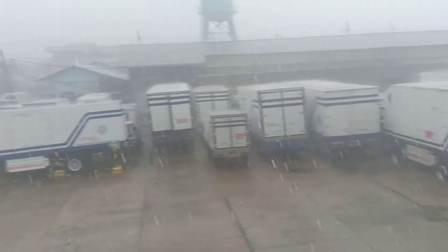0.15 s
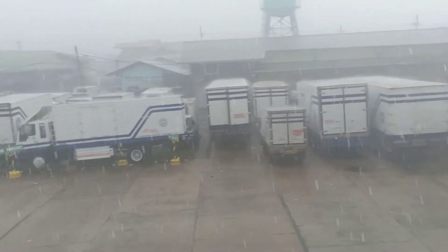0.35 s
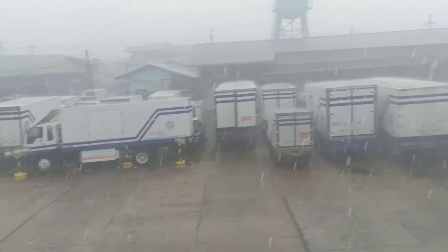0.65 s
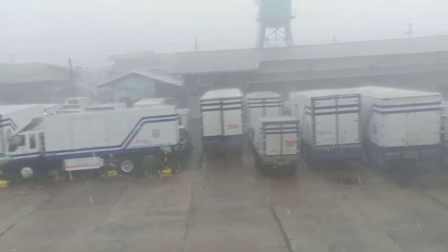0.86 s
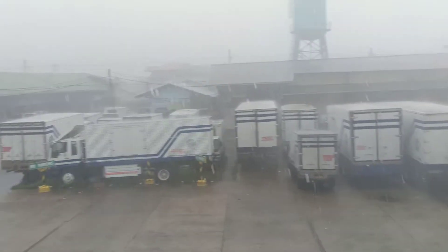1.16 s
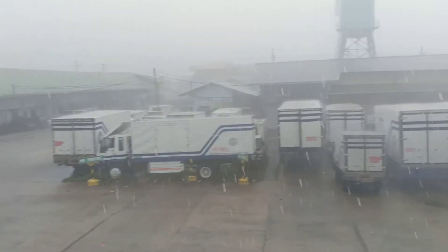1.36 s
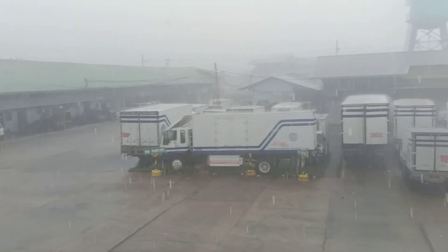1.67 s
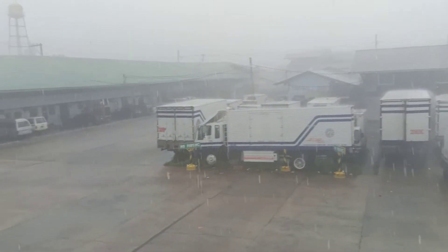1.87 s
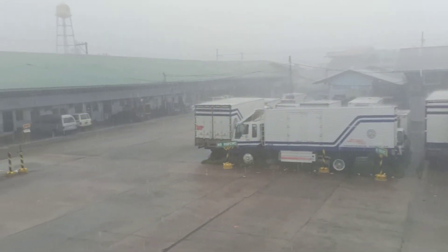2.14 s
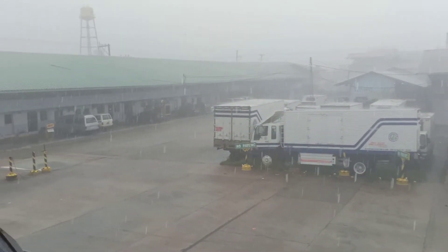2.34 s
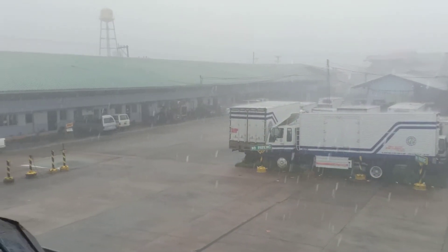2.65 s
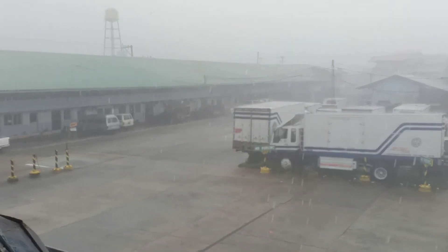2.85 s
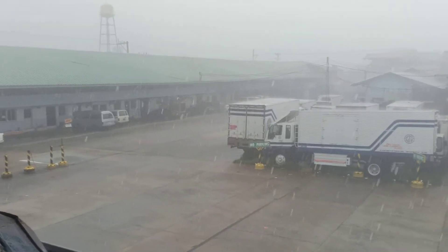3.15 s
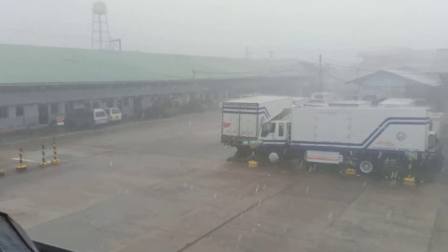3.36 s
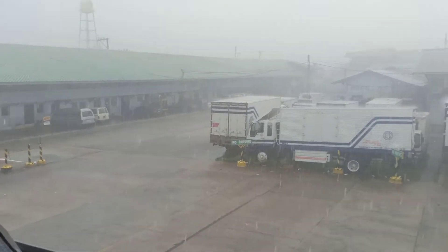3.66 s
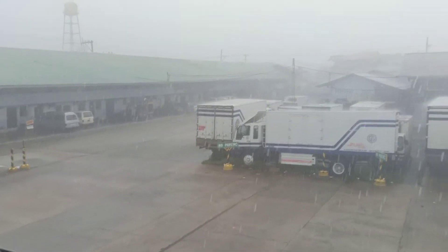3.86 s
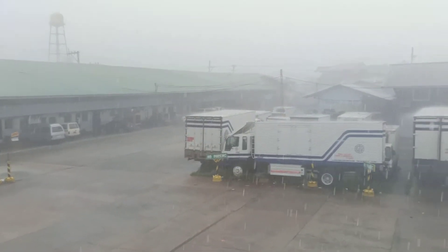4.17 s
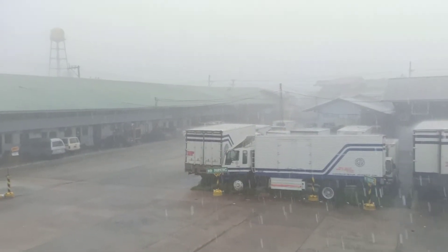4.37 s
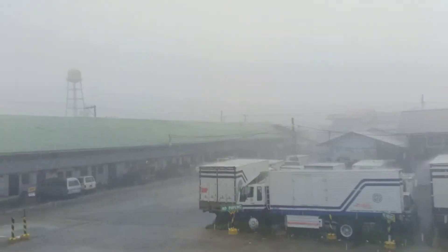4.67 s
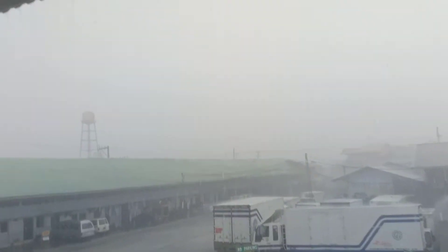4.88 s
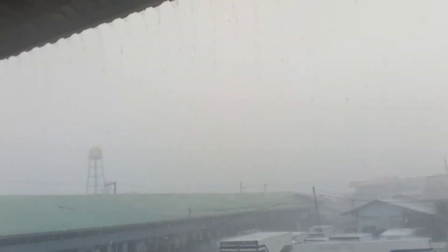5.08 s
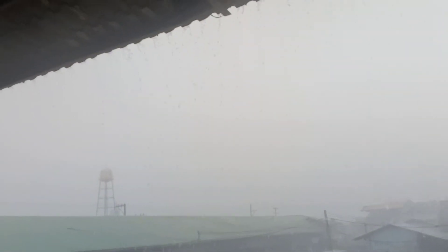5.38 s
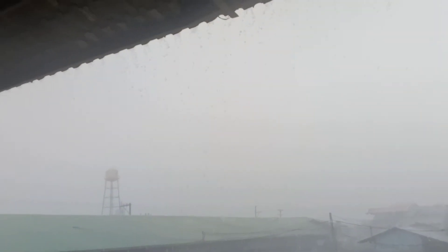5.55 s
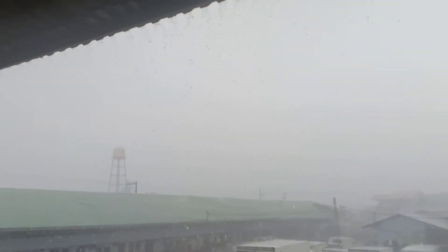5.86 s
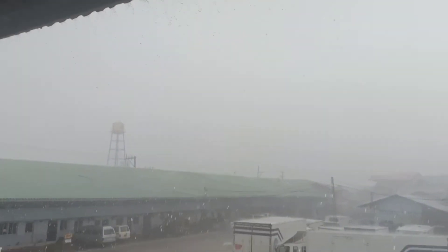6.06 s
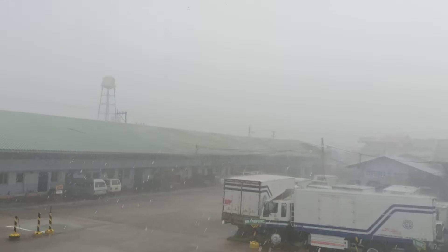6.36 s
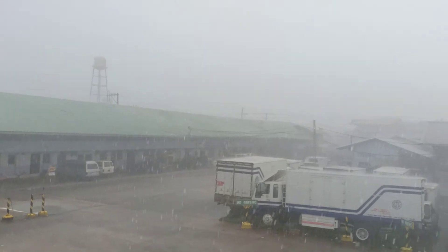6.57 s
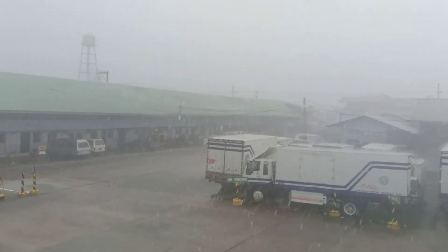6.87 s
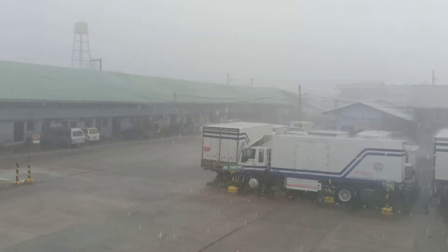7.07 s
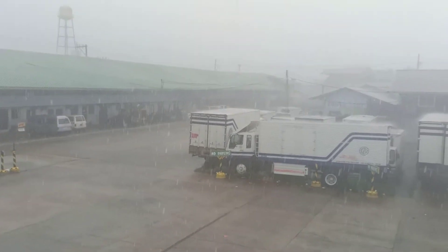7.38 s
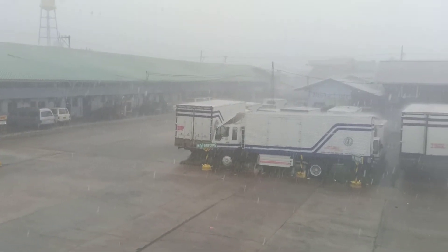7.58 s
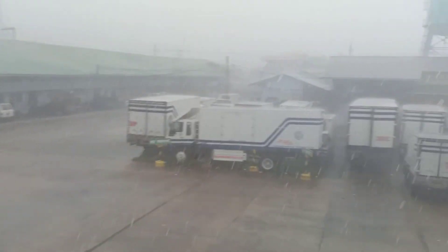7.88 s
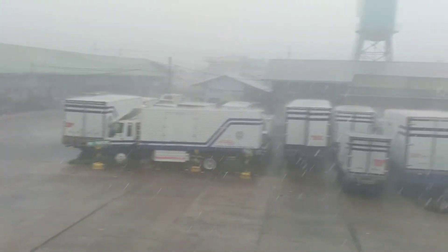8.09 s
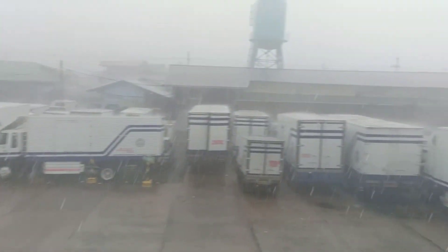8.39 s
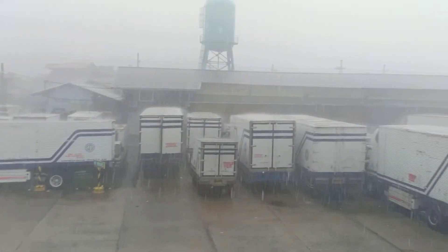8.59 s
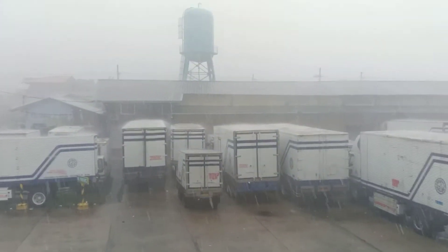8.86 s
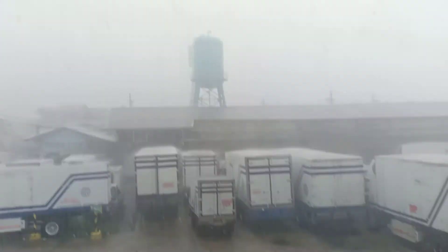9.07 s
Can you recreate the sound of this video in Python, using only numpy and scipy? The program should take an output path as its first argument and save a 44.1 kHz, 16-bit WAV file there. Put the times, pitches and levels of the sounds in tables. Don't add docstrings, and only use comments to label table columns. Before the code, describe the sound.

Heavy rain builds to a steady roar on metal roofs and wet concrete while wind gusts thump and flutter against the microphone.

```python
import sys
import numpy as np
from scipy import signal
from scipy.fft import rfft, irfft, next_fast_len
from scipy.io import wavfile
from scipy.ndimage import uniform_filter1d, map_coordinates

SR = 44100
rng = np.random.default_rng(int(sys.argv[2]) if len(sys.argv) > 2 else 0)


def store_wav(level_fs):
    pcm = np.round(np.clip(np.atleast_2d(level_fs), -1, 1) * 32767)
    wavfile.write(sys.argv[1], SR, pcm.T.astype(np.int16))


def natural_amplitude(level_db):
    exponent = np.asarray(level_db, float) / 20
    return 10 ** exponent


N = 407043
FRAME = 512

# time_s, yard_left_right_db, ridge_hz, ridge_lift_db, second_ridge_lift_db
CAMERA_TURNS = [(0, 1.5, 1490, 1.5, 3), (.8, 0.5, 1450, 0, 4.5), (1.5, 2, 1420, 3, 3),
                (2.4, 2.5, 1750, 3, 2), (3.4, 3.5, 1770, 3.5, 1.5), (4.4, 1.5, 1800, 3.5, 4),
                (4.9, 4, 2030, 5, 1), (5.1, -1, 2200, 8, .2), (5.7, -3.5, 2350, 7.5, 2),
                (6.15, -1.5, 2300, 7.5, .5), (6.4, 0.5, 2000, 8.5, 2), (7.3, 3.5, 1980, 2.5, .5),
                (8.2, 0.5, 1930, 6.5, 5.5), (8.7, 1.5, 2250, 2.5, 3.5), (9.23, 3, 2400, 1, .7)]


def rain():
    # time_s, downpour_db, spray_fineness_db, share_on_roofs_db
    downpour = [(0.0, -36, 0, 2), (1.16, -31.5, -0.5, -1), (1.54, -29, -1.5, 0), (2.0, -28.5, 0, 0),
                (3.01, -25, 0, 1), (3.37, -21.5, -1, -0.5), (4.42, -23.5, 1.5, 0), (5.73, -22.5, 1.5, 0.5),
                (6.35, -24.5, 3, 1), (7.17, -22, 1.5, 1), (7.4, -19.5, -0.5, -1), (7.56, -22, 0, 0.5),
                (8.1, -21, 0, -1), (8.23, -23.5, 0.5, 0.5), (8.71, -22.5, 0.5, -1), (8.92, -20.5, -1, -0.5),
                (9.23, -23.5, -1, 0)]
    # pitch_hz, level_db (per Hz)
    roar_tone = [(30, -120), (60, -20), (100, -11), (200, -8.5), (300, -5.5), (440, -2.5), (600, -0.5),
                 (800, -2), (1000, -3.5), (1300, -7), (1800, -11), (2600, -19), (4000, -120)]
    # pitch_hz, level_db (per Hz)
    spatter_tone = [(600, -120), (1000, -19), (1300, -11), (1700, -6), (2300, -3), (2900, -8),
                    (3300, -15.5), (4000, -36), (6000, -120)]
    # pitch_hz, level_db (per Hz)
    hiss_tone = [(1500, -120), (2500, -10.5), (3200, -6), (3600, -4), (4300, -2.5), (5040, 1), (5500, -3.5),
                 (6000, -5.5), (6600, -12), (7700, -18.5), (8200, -19.5), (8800, -22.5), (9200, -22),
                 (9600, -26.5), (10500, -65)]
    # pitch_hz, level_db (per Hz)
    fizz_tone = [(9000, -45), (9750, -12), (10250, -5), (10750, -9.5), (11350, -3), (12200, -7),
                 (12900, -6), (13500, 1), (14200, -2.5), (14700, -3.5), (15200, -5), (15500, -3.5)]

    pour_db, fine_db, roofs_db = curves(downpour)
    turn_db = curves(CAMERA_TURNS)[0]
    sides = np.array([[.5], [-.5]])

    def swell(grows, full_db=-23):
        return full_db + grows * (pour_db - full_db)

    sheets = wobble(2.6)
    roar = all_around(drops(spread_db=8.5, patchy_db=-0.27), roar_tone)
    spatter = all_around(drops(spread_db=12.5, patchy_db=0.2), spatter_tone)
    hiss = all_around(drops(spread_db=11, patchy_db=.5), hiss_tone)
    fizz = all_around(drops(spread_db=0, patchy_db=-1.0), fizz_tone)

    roar_db = swell(grows=1.06) - 0.22 + roofs_db - 0.83 * sides
    spatter_db = pour_db - 0.38 - .6 * fine_db + (turn_db - 0.7) * sides
    hiss_db = swell(grows=1) - 2.5 + .6 * fine_db + (3 + 0.13 * turn_db) * sides
    fizz_db = swell(grows=0.93) - 14.5 + fine_db + .7 * sides
    falling = natural_amplitude(roar_db) * roar + natural_amplitude(spatter_db) * spatter + natural_amplitude(hiss_db) * hiss + natural_amplitude(fizz_db) * fizz
    return housing(natural_amplitude(0.41 * sheets) * falling, width_hz=300)


def drops(spread_db, patchy_db):
    hits = rng.standard_normal((2, N)) * natural_amplitude(spread_db * rng.random((2, N)))
    z = signal.stft(hits, SR, nperseg=FRAME)[2]
    field = uniform_filter1d(rng.standard_normal(z.shape), size=6, axis=1)
    field = uniform_filter1d(field, size=20, axis=2)
    return signal.istft(z * natural_amplitude(patchy_db * unit(field)), SR, nperseg=FRAME)[1][:, :N]


def all_around(pair, spectrum):
    port_gap_m, sound_speed_m_s = 0.17, 343

    def shares(hz):
        alike = np.sinc(2 * hz * port_gap_m / sound_speed_m_s)
        angle = np.arccos(np.clip(alike, -1, 1)) / 2
        return natural_amplitude(along(spectrum, hz)) * [np.cos(angle), np.sin(angle)]

    mid, side = filtered(pair, shares)
    return unit(np.array([mid + side, mid - side]))


def housing(x, width_hz):
    hz, s, z = signal.stft(x, SR, nperseg=FRAME)
    times, turn_db, *cols = np.transpose(CAMERA_TURNS)
    low_hz, low_db, upper_db = (np.interp(s, times, c) for c in cols)

    def ridge(centre, db, wide=1):
        return db * np.exp(-((hz[:, None] - centre) / (wide * width_hz)) ** 2)

    upper_hz = 2640 + 0.76 * (low_hz - low_hz.mean())
    left_db = ridge(low_hz, low_db, wide=0.9) + ridge(upper_hz, upper_db)
    right_db = ridge(2250, -0.4 + 0.27 * low_db)
    return signal.istft(z * natural_amplitude([left_db, right_db]), SR, nperseg=FRAME)[1][:, :N]


def eddies(table):
    out, t = np.zeros(N + SR), np.arange(-SR // 32, SR // 32) / SR

    def swing(t, hz, start):
        cycles = 0.65 * (hz / 140) ** -.35
        return np.exp(-(t * hz / cycles) ** 2) * np.cos(2 * np.pi * (hz * t + start))

    for (s, db, hz), chance in zip(table, rng.random((len(table), 5, 3))):
        shed = sum(swing(t - .034 * (when - .5), hz * (0.82 + 0.68 * size), start)
                   for when, size, start in chance[1:])
        whole = swing(t, hz, chance[0, 0]) + natural_amplitude(-10.0) * shed
        out[round(s * SR):][:len(t)] += natural_amplitude(db + 1.2) * whole
    return out[len(t) // 2:][:N]


def small_eddies(wind_db, count):
    when, size, pitch = rng.random((count, 3)).T
    db = wind_db[(when * N).astype(int)] + 5.5 - 6 * size
    return list(zip(when * N / SR, db, 133 * (0.74 + .45 * pitch)))


def buffeting(wind_db):
    # pitch_hz, level_db (per Hz)
    buffet_tone = [(18, -50), (30, -6), (50, -1.5), (80, 5), (130, 3.5), (200, -2), (320, -5.5), (600, -23),
                   (1200, -62)]
    # pitch_hz, level_db (per Hz)
    flutter_tone = [(90, -120), (150, 2.5), (260, 3.5), (450, -15), (800, -9), (1300, -29), (2000, -120)]

    def stir(spectrum):
        return filtered(rng.standard_normal((2, N)), lambda hz: natural_amplitude(along(spectrum, hz)))

    lumps = natural_amplitude([4.7 * wobble(25) + 2.9 * wobble(70) for port in range(2)])
    flaps = natural_amplitude([3 * wobble(45) for port in range(2)])
    buffet = even(lumps * stir(buffet_tone), size=2600)
    flutter = even(flaps * stir(flutter_tone), size=3000)
    flutter_db = -7.5 + 0.63 * (wind_db + 20.5)
    return natural_amplitude(wind_db) * (buffet + natural_amplitude(flutter_db) * flutter)


def gusts(table):
    lull_db, rise_s, fall_s = -45.5, 0.022, .035
    t = np.arange(N) / SR

    def shape(s, hold):
        return np.interp(t, [s - rise_s, s, s + hold, s + hold + fall_s], [0, 1, 1, 0])

    return 20 * np.log10(natural_amplitude(lull_db) + sum(natural_amplitude(db) * shape(s, hold) for s, hold, db in table))


def unit(x):
    return x / np.sqrt(np.mean(x ** 2) + 1e-20)


def even(x, size):
    power = uniform_filter1d(uniform_filter1d(x ** 2, size=size), size=size)
    return x / np.sqrt(np.abs(power) + 1e-20)


def along(points, hz):
    f, v = np.transpose(points)
    return np.interp(np.log(hz + 1), np.log(f + 1), v)


def curves(rows):
    s, *cols = np.transpose(rows)
    return np.array([np.interp(np.arange(N) / SR, s, c) for c in cols])


def wobble(rate):
    knots = rng.standard_normal(int(N * rate / SR) + 4)
    return map_coordinates(knots, [np.arange(N) * rate / SR])


def filtered(x, response):
    m = next_fast_len(N + 8192)
    return irfft(rfft(x, m) * response(np.fft.rfftfreq(m, 1 / SR)), m)[..., :N]


def scene():
    # peak_s, peak_db, swing_hz
    left_eddies = [(0.057, -17, 460), (0.17, -16, 630), (0.322, -16, 510), (0.633, -19, 410),
                   (0.781, -19, 560), (0.91, -18, 180), (0.91, -10, 440), (0.943, -16, 360),
                   (1.049, -22, 140), (2.45, -23, 121), (3.667, -30, 150), (4.089, -20, 110),
                   (4.754, -17.5, 130), (4.881, -23, 130), (4.942, -23, 140), (6.144, -16, 160),
                   (8.114, -13.5, 160), (8.147, -15, 131), (8.207, -17, 130), (8.492, -17, 160),
                   (8.531, -16, 140), (8.606, -12, 159), (8.697, -10.5, 190), (8.873, -12, 128),
                   (9.004, -7, 408), (9.015, -7, 154), (9.061, -11, 171), (9.102, -18, 130),
                   (9.16, -14, 170)]
    # peak_s, peak_db, swing_hz
    right_eddies = [(0.315, -12, 483), (0.316, -20, 160), (0.373, -20, 120), (0.374, -13.5, 520),
                    (0.396, -19, 470), (0.456, -14, 560), (0.474, -12.5, 590), (0.517, -15, 440),
                    (0.577, -21, 110), (0.642, -15, 380), (0.647, -19, 120), (0.66, -14, 470),
                    (0.683, -12, 470), (0.706, -7.5, 696), (0.81, -16, 530), (0.919, -19, 140),
                    (1.011, -20, 190), (1.416, -23, 160), (2.602, -16, 159), (4.261, -27, 130),
                    (7.482, -8, 670), (8.265, -21, 180), (8.347, -17, 138), (8.918, -14, 160),
                    (8.945, -17, 180), (9.045, -18, 150), (9.108, -20, 150)]
    # start_s, hold_s, strength_db
    left_gusts = [(0, 0.2, -34.5), (.25, 0.48, -34.5), (.78, .35, -29.5), (1.26, .05, -37),
                  (1.37, .12, -38), (1.87, .5, -42), (2.42, 0.14, -30.5), (2.75, .4, -47),
                  (3.28, 0.16, -49), (3.6, .1, -35), (4.07, 0.034, -39), (4.27, .17, -34), (4.49, .13, -40),
                  (4.73, 0.46, -33.5), (5.25, 0.13, -40), (5.85, .03, -36), (5.96, .08, -38),
                  (6.13, 0.043, -29), (6.23, .04, -35), (6.42, 0.037, -40), (6.55, .13, -40),
                  (6.86, 0.034, -33), (7.04, .05, -44), (7.2, 0.12, -42), (7.78, .04, -32),
                  (8.1, 0.18, -25.5), (8.44, .04, -28), (8.5, 0.43, -27.5), (8.96, 0.24, -24.5)]
    # start_s, hold_s, strength_db
    right_gusts = [(.29, 0.19, -30), (.56, 0.147, -24), (.75, .06, -31), (.89, 0.24, -33), (1.39, .06, -37),
                   (1.57, 0.083, -44), (1.85, 0.11, -33), (2.09, .04, -34), (2.45, .1, -38),
                   (2.58, 0.044, -35), (2.69, .05, -37), (3.5, .2, -51), (4.21, 0.07, -31), (4.8, .38, -37),
                   (5.47, 0.044, -39), (6.73, .3, -54), (7.18, .15, -50), (7.76, 0.17, -36),
                   (8.12, .06, -32), (8.25, .09, -24), (8.46, 0.19, -36), (8.8, .33, -39)]

    wind_db = np.array([gusts(left_gusts), gusts(right_gusts)])
    swirls = [eddies(list(big) + small_eddies(db, count=60))
              for big, db in zip((left_eddies, right_eddies), wind_db)]
    return rain() + buffeting(wind_db) + np.array(swirls)


def top_cut(x):
    return signal.sosfilt(signal.butter(12, 15490, fs=SR, output="sos"), x)


def record(dry):
    low_cut = signal.butter(2, 52, 'high', fs=SR, output='sos')
    mix = signal.sosfilt(low_cut, dry)
    return top_cut(mix)


dry = scene()
out = record(dry)
store_wav(out)
```